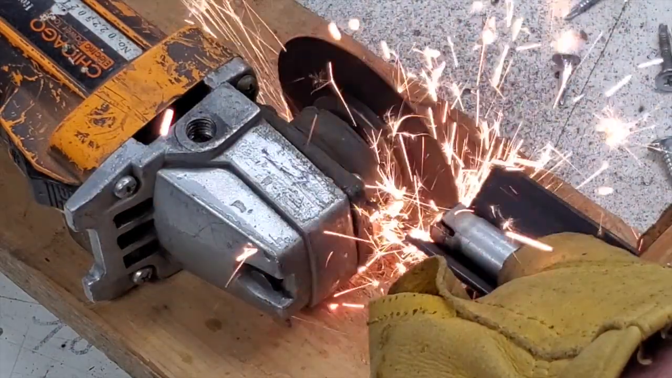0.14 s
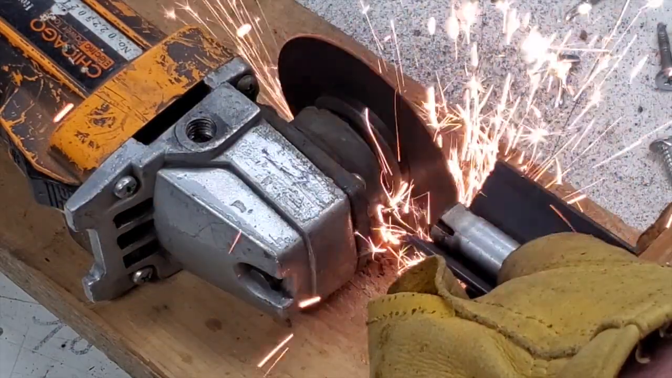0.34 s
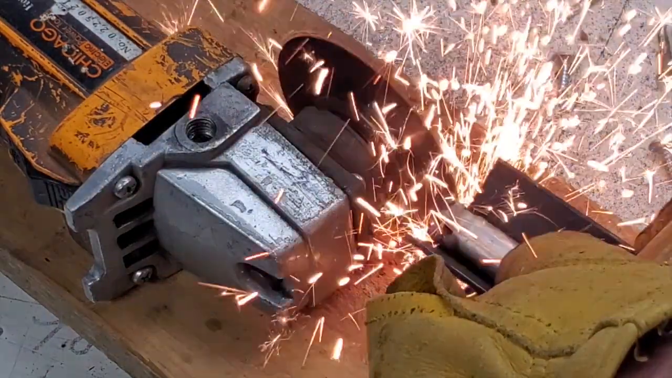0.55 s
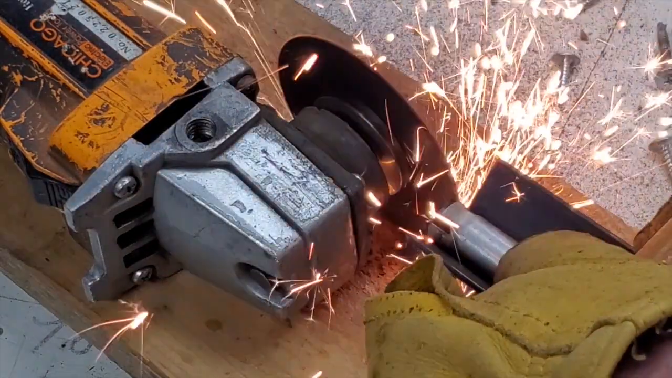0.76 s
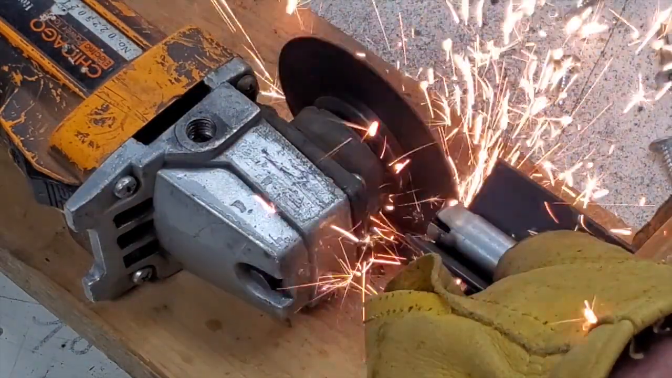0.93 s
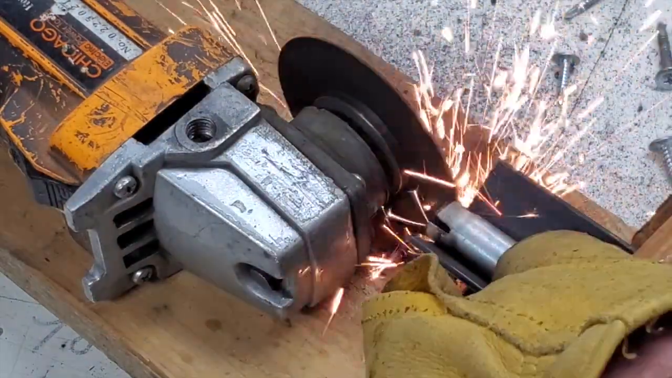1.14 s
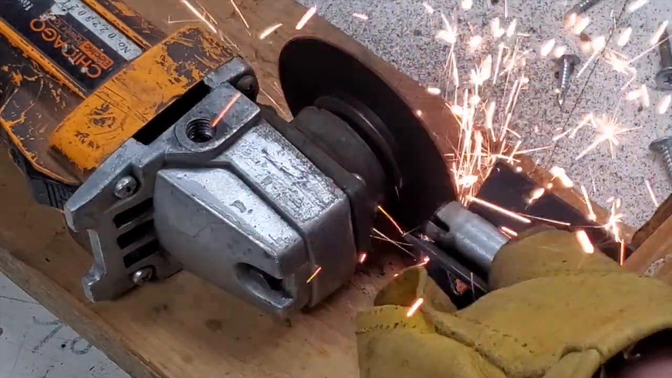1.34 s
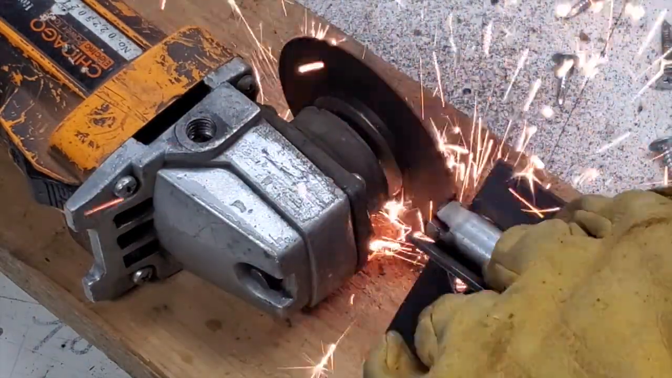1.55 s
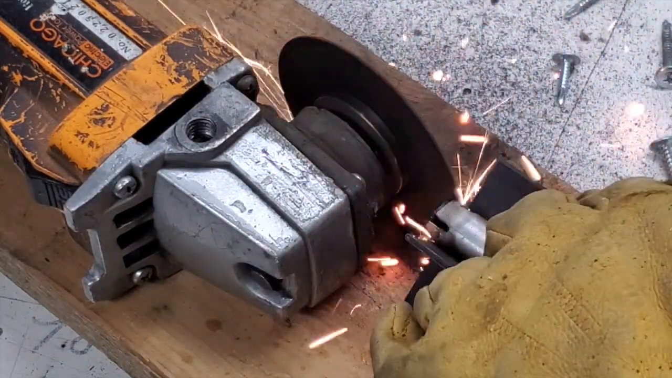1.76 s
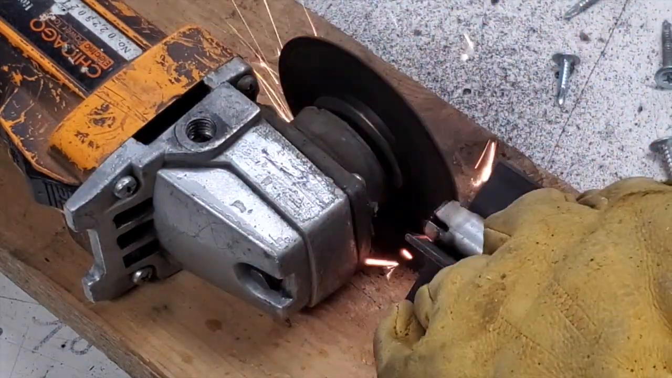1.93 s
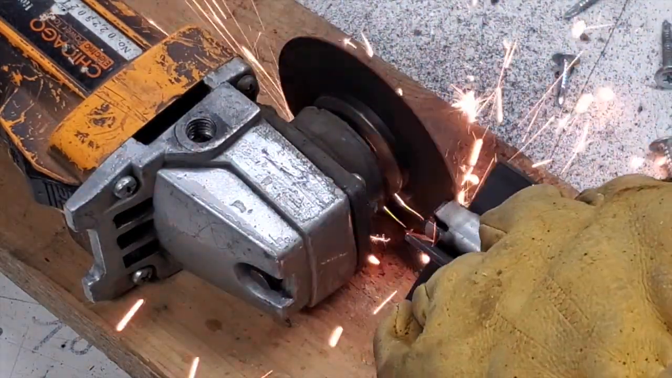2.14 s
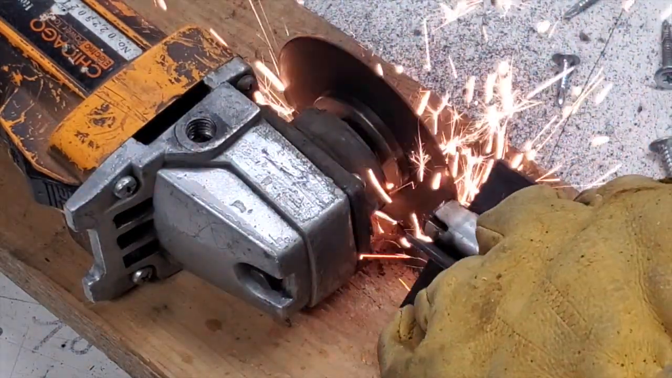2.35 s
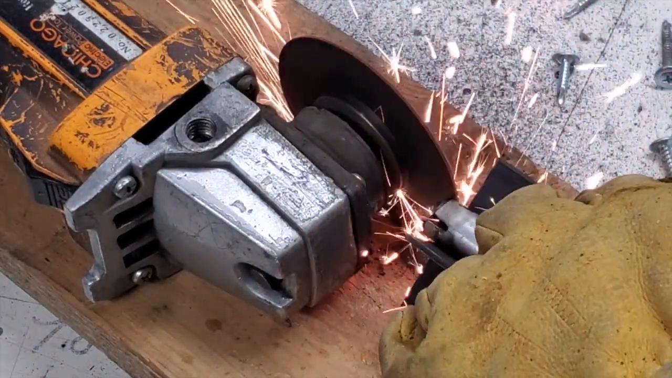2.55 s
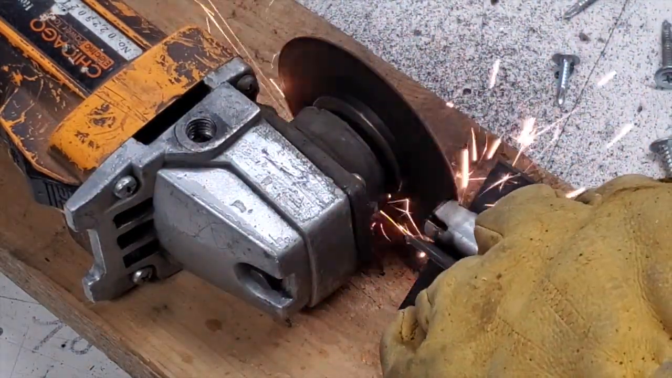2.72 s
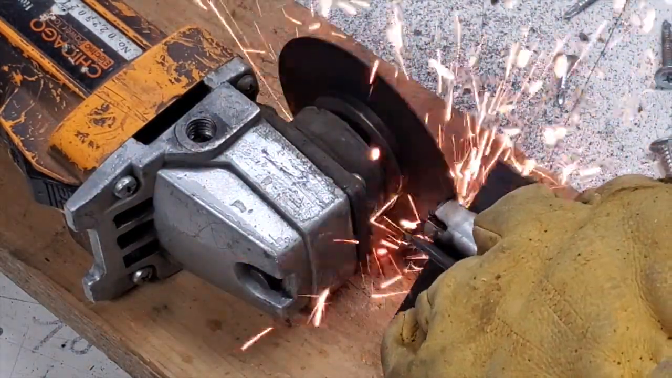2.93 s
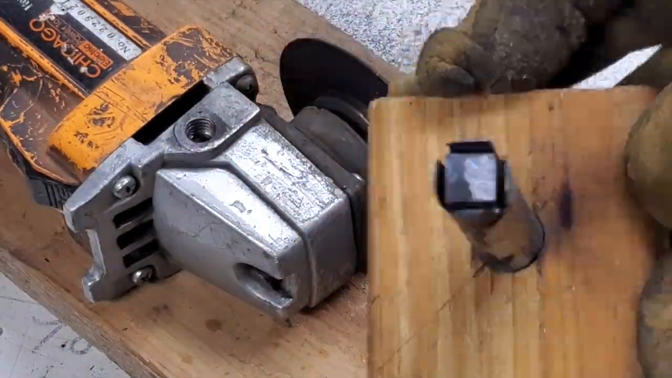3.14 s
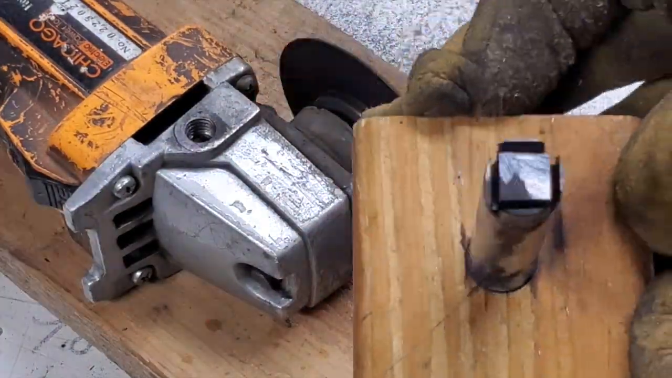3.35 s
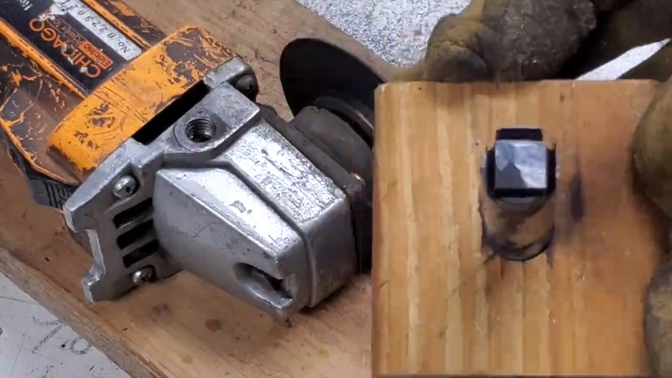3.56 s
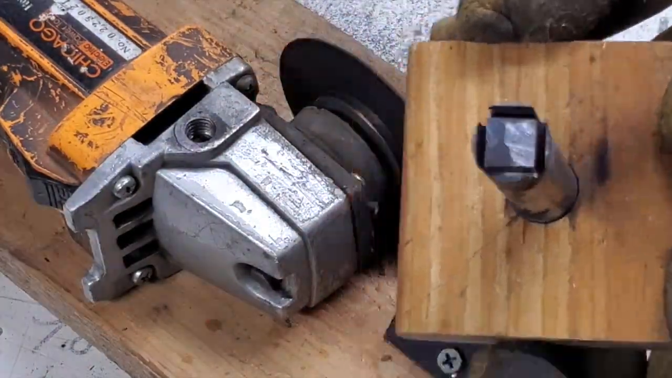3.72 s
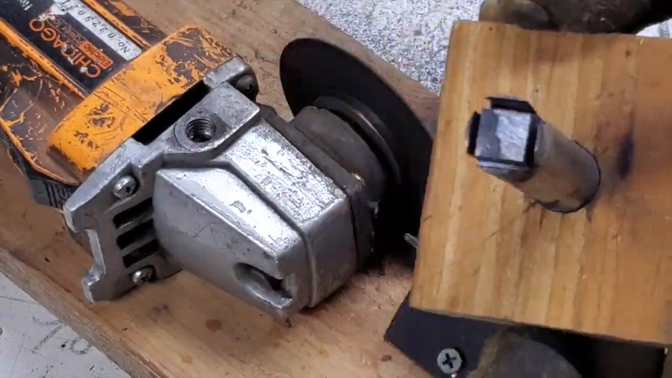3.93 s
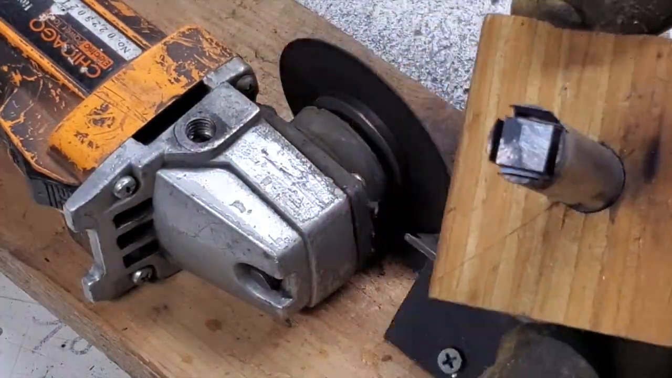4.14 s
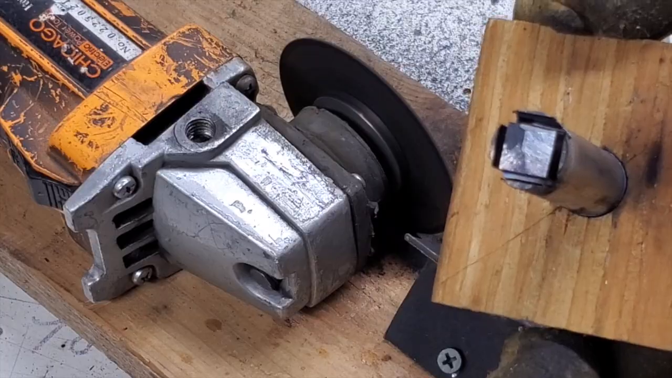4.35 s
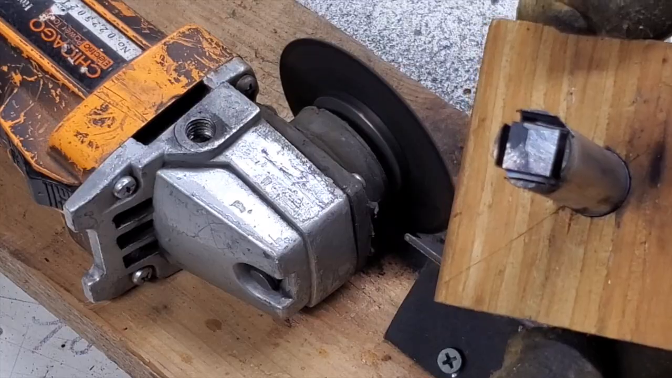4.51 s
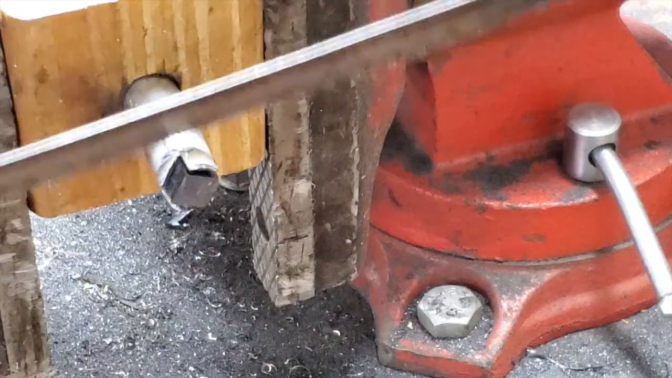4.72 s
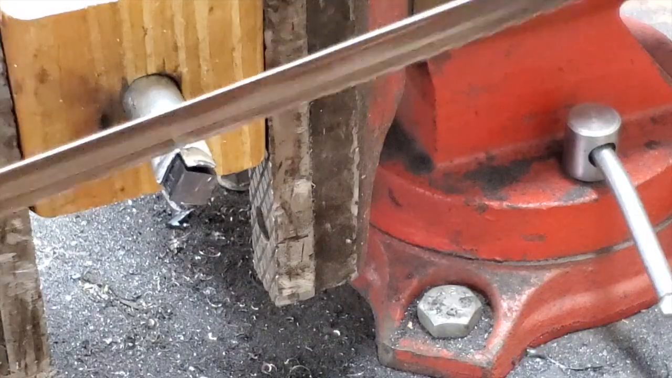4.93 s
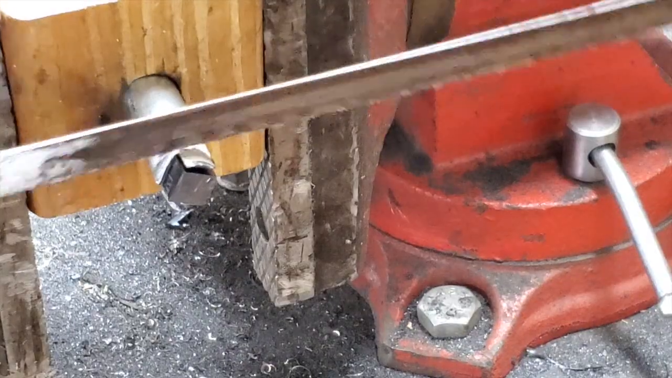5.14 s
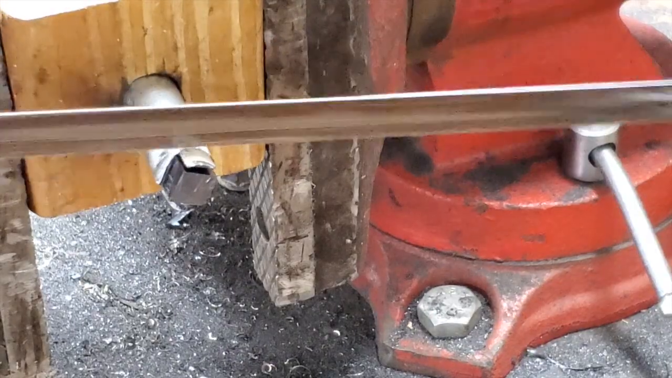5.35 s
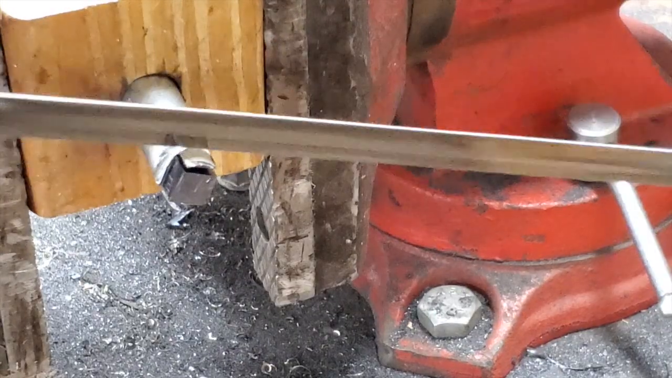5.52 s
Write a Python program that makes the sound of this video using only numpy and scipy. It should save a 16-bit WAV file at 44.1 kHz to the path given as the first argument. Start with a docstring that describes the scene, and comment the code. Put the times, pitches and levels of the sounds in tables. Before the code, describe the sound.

A grinder screeches and rasps on steel with sagging motor whine, cuts abruptly to a quiet fan hum, then rapid squeaky filing.

```python
"""A grinder's sagging whine, gritty rasp and screech give way abruptly to a fan's hum, then to quick filing.
Grinder: a bolt pressed to the disc loads the rotor, whose turns set the motor tones and the blows on steel.
Fan: wavering tones and a thin whistle stand over coloured noise of rushing air.
File: teeth scrape the bolt in a vice in short alternating strokes, exciting squeaks and ringing modes."""
import sys
import numpy as np
from scipy import signal
from scipy.fft import rfft, irfft, next_fast_len
from scipy.io import wavfile
from scipy.ndimage import uniform_filter1d

SR = 44100
rng = np.random.default_rng(int(sys.argv[2]) if len(sys.argv) > 2 else 0)


def pcm_store(signal):
    """Save signal as 16-bit PCM."""
    levels = np.round(np.clip(np.atleast_2d(signal), -1, 1) * 32767)
    wavfile.write(sys.argv[1], SR, levels.astype(np.int16).T)


N = 246075
TIME = np.arange(N) / SR
GRINDER_END_S, FILING_START_S = 3.053, 4.679

# stereo image of the grinder: frequency_hz, left_minus_right_db, likeness (1 same, -1 opposite; clipped)
GRINDER_IMAGE = [(50, -3.5, 1), (400, 1, 1), (1400, -3.5, 1), (2180, -4, 0.53), (3150, -0.5, 1),
                 (5500, -1.5, 0.63), (8200, 0.5, 0.67), (10100, 4, 0.56), (10540, 4, -0.046),
                 (12200, 15, 0.47), (13040, 10, 0.0094), (14100, 4, -0.6), (14600, -2, -0.37),
                 (15300, 9, -0.68)]
# stereo image of the file and bench: frequency_hz, left_minus_right_db, likeness (1 same, -1 opposite)
FILE_IMAGE = [(100, 0, 0.26), (300, 4.5, 0.079), (1620, -1.5, 0.74), (2360, -1, 0.15), (2950, -1, 0.9),
              (4530, -1, 0.17), (10000, 0.5, 0.46), (12900, 4, 0.3), (14000, 2, -.3), (15500, -1, 0.33)]
# the hand shifts its grip with a dull bump: middle_s, length_s, level_db
JOLTS = [(1.5, 0.18, -58)]


def grinder(rumble_db=-63, shake_db=-74):
    """Common drive: one rotor phase locks motor, rasp and screech; even chatter also shakes the bench."""
    # speed that the load allows the motor: time_s, speed_hz (rotor turns per second)
    allowed_speed = [(0.0, 581.0), (0.301, 591.1), (0.562, 542.0), (0.678, 472.4), (0.704, 498.8),
                     (0.854, 501.7), (0.949, 476.0), (1.039, 511.9), (1.207, 515.0), (1.262, 484.4),
                     (1.313, 500.4), (1.404, 489.6), (1.565, 515.6), (1.618, 499.6), (2.184, 473.0),
                     (2.26, 461.3), (2.362, 419.4), (2.542, 419.5), (2.705, 407.2), (2.931, 466.0),
                     (3.05, 426.8)]
    # pressure of the bolt on the disc: time_s, rasp_db, screech_db
    contact = [(0.0, -25, -23), (0.1, -26, -24.5), (0.58, -23.5, -20.5), (0.66, -24, -18), (0.68, -28, -22),
               (0.79, -25.5, -22), (1.42, -23.5, -19.5), (2.01, -27.5, -21), (2.28, -24.5, -19.5),
               (2.3, -25, -17), (2.51, -27.5, -16.5), (2.73, -27, -17.5), (2.89, -29, -22.5),
               (3.04, -25.5, -18)]
    # low rumble spectrum: frequency_hz, level_db (per Hz, relative)
    rumble_spectrum = [(25, -19), (70, -16), (130, -11.5), (200, -3.5), (290, 4.5), (400, -2.5)]
    inertia_s = .05  # the rotor's inertia rounds every change of load
    speed = uniform_filter1d(in_time(allowed_speed)[0], size=int(inertia_s * SR), mode="nearest")
    speed = speed * (1 + 0.001627 * drift(20))  # the motor never runs quite evenly
    turns = np.cumsum(speed) / SR
    rasp_db, screech_db = in_time(contact)
    chatter = chatter_share(speed)
    rumble_gain = from_db(rumble_db) + swells(JOLTS)
    rumble = rumble_gain * noise(rumble_spectrum, GRINDER_IMAGE, from_db(2.0 * drift(5.8)))
    shake = from_db(shake_db) * chatter * noise([(25, 0), (130, 0.0087)], FILE_IMAGE)
    tool = motor(speed, turns, rasp_db) + rasp(turns, rasp_db) + screech(turns, screech_db, chatter)
    return tool + rumble + shake


def motor(speed, turns, rasp_db, smear_per_multiple=0.08):
    """Rotating excitation: unbalance hums at rotor speed, a bearing whines above, load reweights the lines."""
    # rotor speeds at which the motor lines are given (Hz), falling with load
    load_speeds_hz = [575, 497, 460, 420]
    # motor lines: multiple (of rotor speed; broken ones are bearing sidebands),
    # then level_db at each load speed (before housing and strain)
    motor_lines = [(1.457, -55, -58.5, -58, -69.5), (2, -45.5, -45.5, -51.5, -52.5),
                   (3, -46, -41, -41, -47.5), (3.457, -41, -50.5, -79, -53.5), (4, -45, -43, -42.5, -50.5),
                   (5, -40, -49, -51, -50), (6, -42.5, -40.5, -43.5, -50), (6.371, -34.5, -41, -68, -51),
                   (7, -44.5, -39, -38, -42), (7.371, -47.5, -45.5, -45.5, -47), (8, -45, -49, -30, -39.5),
                   (9, -56, -44.5, -38.5, -41), (10, -47, -45, -44, -54), (12, -74, -48.5, -38, -73),
                   (15, -52, -42, -49, -48), (16, -58, -55, -35, -56)]
    # gear housing resonances favour the lines passing through: frequency_hz, gain_db
    housing = [(800, -3.5), (1200, 1), (1450, 2.5), (2000, 1), (2900, -1), (3350, 2.5), (3700, -0.5),
               (4200, 4.5), (5500, 1), (7700, 2)]
    # hum and whine swell at resonance: rotor_speed_hz, unbalance_hum_db, bearing_whine_db
    resonance = [(394, -43, -77), (433, -38.5, -61.5), (471.6, -37, -49.5), (485.5, -40.5, -46),
                 (508, -52.5, -56.5), (551, -44.5, -34), (585, -51.5, -33)]
    # commutator whistles: multiples of rotor speed
    commutator_orders = (29, 30, 31, 32)
    # level of those whistles where they pass: frequency_hz, level_db
    commutator = [(13000, -37), (13900, -36), (14300, -34), (14700, -38), (15400, -50), (16500, -56)]
    bearing_order = 2.457  # multiple of rotor speed
    jolt_damping_db = -17  # the hand damps the hum while the grip shifts
    strain_db, strain_follows = -1.47, .6  # at mean pressure; share of the rasp's swing

    hum_db, whine_db = at_hz(resonance, speed)
    hum_db = hum_db + jolt_damping_db * swells([(s, length, 0) for s, length, _ in JOLTS])
    pressure_db = rasp_db - rasp_db[TIME < GRINDER_END_S].mean()
    line_gain_db = strain_db + sag_db(speed) + strain_follows * pressure_db
    out = from_db(hum_db) * tone(turns, waver_db=1.37, smear=.04) * pan(-1.6)
    out += from_db(whine_db) * tone(bearing_order * turns, waver_db=1.1, smear=0.23) * pan(-5.0)
    for multiple, *levels_db in motor_lines:
        level_db = np.interp(speed, load_speeds_hz[::-1], levels_db[::-1])
        level_db = level_db + line_gain_db + at_hz(housing, multiple * speed)[0]
        balance_db = at_hz(GRINDER_IMAGE, multiple * load_speeds_hz[1])[0]
        line = tone(multiple * turns, waver_db=3.0, smear=smear_per_multiple * multiple)
        out += from_db(level_db) * line * pan(balance_db)
    for multiple in commutator_orders:
        level_db = at_hz(commutator, multiple * speed)[0]
        out += from_db(level_db) * tone(multiple * turns, waver_db=3.5, smear=0.97)
    return out


def sag_db(speed, limit_db=3):
    """Load response: the motor growls louder while speed lies under its running mean, softer above it."""
    window_s, db_per_hz = .3, 0.16
    usual = uniform_filter1d(speed, size=int(window_s * SR), mode="nearest")
    return np.clip(db_per_hz * (usual - speed), -limit_db, limit_db)


def rasp(turns, rasp_db, grit_db=0.5, bounce_db=1.17, flutter_db=1.0, shriek_db=-8):
    """Abrasive friction: uneven bites modulate noise, the disc resonates, and catches bark or shriek."""
    # lower and upper spectrum of the rasp: frequency_hz, level_db (per Hz, relative)
    body_spectrum = [(100, -36), (200, -29), (290, -48), (400, -20), (800, -17.5), (1100, -11), (1450, -1),
                     (1750, -6.5), (2000, -1), (2650, -7), (3300, 3), (4300, 3), (4700, -3.5), (5150, 2.5),
                     (6200, -7)]
    hiss_spectrum = [(5400, -12), (5800, -7), (6200, -10.5), (6650, 2.5), (7200, -3.5), (8200, 1.5),
                     (8800, -5.5), (9900, 1), (10800, -1), (14000, -0.5), (15800, 3.5)]
    # the bolt catches on the disc: middle_s, length_s, level_db (before the trims of bark and shriek)
    catches = [(0.444, 0.13, -31.5), (0.587, 0.02, -26), (0.645, 0.033, -27), (0.926, 0.11, -33),
               (1, .025, -30), (2.194, 0.041, -30), (2.752, .0058, -27), (3.013, 0.0035, -21)]
    # spectrum of the bark: frequency_hz, level_db (per Hz, relative)
    bark_spectrum = [(2800, -23), (3500, -31), (4100, 9), (5200, -5), (6500, -14), (9000, 1)]
    # multiples of rotor speed that shriek in a catch
    bark_orders = (7, 8, 9)
    # disc and guard ring under the grit: frequency_hz, width_hz, level_db (relative to the rasp)
    disc_modes = [(3410, 60, -16.5), (4910, 160, -15.5), (8135, 120, -12)]
    shriek_build_s = .02  # a catch must last longer than this to shriek

    bites = from_db(grit_db * drift(700) + bounce_db * drift(65)) * once_a_turn(turns, sharpness=0.13)
    # the bolt flutters in the hand
    body = noise(body_spectrum, GRINDER_IMAGE, bites * from_db(flutter_db * drift(160)))
    hiss = noise(hiss_spectrum, GRINDER_IMAGE, bites)
    grit = bites * rng.standard_normal(N)
    disc = sum(from_db(db) * rms_one(resonate(grit, hz, width_hz)) for hz, width_hz, db in disc_modes)
    shriek = sum(tone(multiple * turns, waver_db=4.5, smear=0.84) for multiple in bark_orders)
    held = swells([(s, length, db) for s, length, db in catches if length > shriek_build_s])
    bark_noise = noise(bark_spectrum, GRINDER_IMAGE, bites * once_a_turn(turns, sharpness=.8))
    bark = held * from_db(shriek_db) * shriek + from_db(-2.5) * swells(catches) * bark_noise
    return from_db(rasp_db) * (from_db(-4.0) * body + from_db(-2.5) * hiss + disc) + bark


def screech(turns, screech_db, chatter, trim_db=0.3, uneven_db=2.0, flicker_db=1.5):
    """Impact excitation: once-a-turn contact spits hiss when loose and rings modes in step when held hard."""
    # spectrum of the loose screech: frequency_hz, level_db (per Hz, relative)
    hiss_spectrum = [(10000, -17.5), (11000, -17), (11700, -10), (12150, -10), (12600, -2.5), (13050, -1.5),
                     (13550, -8.5), (14200, -5), (14800, -23.5), (15800, -40)]
    # ringing of the steel: frequency_hz, width_hz (of each of two passes), level_db (relative)
    steel_modes = [(11650, 230, 3), (12480, 710, 7), (13020, 310, 2), (14400, 840, -26)]
    bursts = once_a_turn(turns, sharpness=0.22) * from_db(flicker_db * drift(350))
    loose = noise(hiss_spectrum, GRINDER_IMAGE, bursts)
    # one blow a turn sets the steel ringing; its timing steadies as the chatter grows
    blows = np.interp(np.arange(1, int(turns[-1])) - .25, turns, TIME)
    chance = rng.standard_normal((len(blows), 2))
    jitter_s = np.interp(np.interp(blows, TIME, chatter), [.2, .8], [15e-6, 7e-6])
    places = (blows + jitter_s * chance[:, 0]) * SR
    clicks = np.zeros(N)
    # a short sinc places each blow between samples
    for tap in range(-4, 5):
        at = np.clip(places.astype(int) + tap, 0, N - 1)
        clicks[at] += from_db(uneven_db * chance[:, 1]) * np.sinc(at - places)
    ringing = 0
    for hz, width_hz, db in steel_modes:
        mode = resonate(resonate(clicks, hz, width_hz), hz, width_hz)
        ringing = ringing + from_db(db) * mode * pan(at_hz(GRINDER_IMAGE, hz)[0])
    mixed = np.sqrt(1 - chatter) * loose + np.sqrt(chatter) * rms_one(ringing)
    return from_db(screech_db + trim_db) * mixed


def chatter_share(speed):
    """Speed-dependent chatter: a rotor dragged below a threshold strikes the steel more evenly (0-1)."""
    hard_hz, hard_share, loose_share = 427, 0.71, .12
    loose = np.clip(speed - hard_hz, 0, 1)  # the change takes 1 Hz
    return hard_share + (loose_share - hard_share) * loose


def once_a_turn(turns, sharpness):
    """Periodic modulation: contact pressure peaks once in every rotor turn."""
    return np.exp(sharpness * np.cos(2 * np.pi * turns))


def filing(teeth_db=3.5, judder_db=1.5, tail_db=-15, tail_s=0.0038, push_db=-7, pull_db=-8, ring_db=-15):
    """Scraping friction: toothed noise fills each stroke; pushes bite darker, pulls skate and hiss."""
    # the file is set down, slides and bites in: middle_s, length_s, level_db
    touches = [(4.804, 0.013, -49), (4.85, 0.15, -57), (4.963, 0.022, -47.5), (5.018, 0.058, -30)]
    # spectrum of the scrape: frequency_hz, level_db (per Hz, relative)
    teeth_spectrum = [(400, -9), (900, -15), (1200, -1), (1500, -10), (1850, 3), (2500, 2), (3200, -14),
                      (4150, -2), (5500, 2.5), (6300, -1), (8500, 0), (11500, 2.5), (12800, 7), (13400, 4),
                      (15800, 4.5)]
    # the bench shakes under the vice: time_s, change_db
    bench_shake = [(4.7, 0), (4.92, -5), (5.0, 2.5), (5.3, 2), (5.58, -1.5)]
    # spectrum of that shaking: frequency_hz, level_db (per Hz, relative)
    boom_spectrum = [(25, -14.5), (70, -19), (140, -9), (220, -1), (320, -3), (480, -7.5), (700, -16),
                     (1500, -23), (5000, -35), (15000, -41)]
    bite_spectrum = [(1700, -1.5), (2500, -4.0), (3200, 0.5), (4800, 5.5), (5800, -2)]
    skate_spectrum = [(6000, 1), (10000, 16), (12800, -11), (15800, -13)]
    bench_db = -50.5
    push_squeak_hz, push_squeak_db = 2410, -9  # level relative to the stroke
    pull_squeak_hz, pull_squeak_db = 3020, -13.5

    pulls, pushes = to_and_fro()
    strokes = swells(touches) + swells(pulls) + swells(pushes)
    fade = np.exp(-1 / (tail_s * SR))
    tail = from_db(tail_db) * signal.lfilter([1 - fade], [1, -fade], strokes)
    teeth = from_db(teeth_db * drift(600) + judder_db * drift(80))
    scrape = strokes * noise(teeth_spectrum, FILE_IMAGE, teeth) + tail * noise(teeth_spectrum, FILE_IMAGE)
    bite = (swells(touches) + swells(pushes)) * noise(bite_spectrum, FILE_IMAGE, teeth)
    # the file skates only once it is up to speed, from the second pull on
    skate = swells(pulls[1:]) * noise(skate_spectrum, FILE_IMAGE, teeth)
    boom = noise(boom_spectrum, FILE_IMAGE, from_db(4.15 * drift(38.6)))
    bench = from_db(bench_db + in_time(bench_shake)[0]) * boom
    ringing = from_db(ring_db) * vice_ring(strokes)
    singing = from_db(push_squeak_db) * squeaks(pushes, push_squeak_hz)
    singing = singing + from_db(pull_squeak_db) * squeaks([*touches, *pulls], pull_squeak_hz)
    friction = from_db(-6.0) * scrape + from_db(push_db) * bite + from_db(pull_db) * skate
    return friction + ringing + singing + bench


def to_and_fro():
    """Reciprocating motion: pulls and pushes alternate evenly, levelled by the arm's effort."""
    # effort of the filing arm: time_s, level_db
    effort = [(5.07, -28.5), (5.11, -36.5), (5.15, -30.5), (5.33, -28), (5.55, -30.5), (5.6, -26.5)]
    first_stroke_s, stroke_s = 5.0705, .0401  # middle of the first stroke; time per stroke
    pull_s, push_s = 0.034, 0.041  # length in contact
    times = np.arange(first_stroke_s, TIME[-1] + stroke_s / 2, stroke_s)
    strokes = list(zip(times, np.interp(times, *np.transpose(effort))))
    pulls = [(s, pull_s, db) for s, db in strokes[::2]]
    pushes = [(s, push_s, db) for s, db in strokes[1::2]]
    return pulls, pushes


def squeaks(strokes, centre_hz, pass_width_hz=440, scatter_octaves=0.17):
    """Friction-fed resonance: each stroke makes file and bolt sing at a pitch scattered by chance."""
    out = 0
    for stroke in strokes:
        hz = centre_hz * 2 ** (scatter_octaves * rng.standard_normal())
        once = resonate(rng.standard_normal(N), hz, pass_width_hz)
        sing = rms_one(resonate(once, hz, pass_width_hz))
        out = out + swells([stroke]) * sing
    return out


def vice_ring(strokes, uneven_db=5.5):
    """Modal ringing: scraping feeds each mode with shifting strength, and modes decay past each stroke."""
    # ringing of file, bolt and vice: frequency_hz, width_hz, level_db (relative)
    vice_modes = [(1910, 32, -10), (2270, 24, -8), (2530, 36, -10), (2776, 48, -2.5), (3875, 18, -2),
                  (4150, 53, -3), (5010, 100, -5.5), (6290, 200, 2.5), (8060, 150, -2.5), (9450, 180, -6.5),
                  (10550, 130, -7), (12400, 230, -4), (12600, 220, 3), (14200, 160, 3)]
    out = 0
    for hz, width_hz, db in vice_modes:
        drive = strokes * from_db(db + uneven_db * drift(14)) * rng.standard_normal((2, N))
        # a narrow mode keeps only its share of the drive's power, so it is scaled back up
        power_makeup = np.sqrt(SR / (np.pi * width_hz))
        out = out + resonate(drive, hz, width_hz) * power_makeup * pan(at_hz(FILE_IMAGE, hz)[0])
    return out


def fan():
    """Tones over broadband flow noise: wavering hums and a thin whistle stand above rushing air."""
    # fan tones: frequency_hz, level_db, left_minus_right_db
    fan_tones = [(236, -83, 0), (343, -73.5, -1), (688, -59.5, -9), (842, -60, 3.5), (1035, -62.5, 6),
                 (1376, -68.5, -8), (1550, -81, -9), (1724, -64.5, -18), (1840, -67.5, 2), (2200, -60, 0),
                 (2454, -66, 0), (2430, -72, 6), (2800, -66.5, -22), (5800, -62.5, 8), (6200, -63, 2),
                 (10148.5, -54.5, -17)]
    # spectrum of the air: frequency_hz, level_db (per Hz, relative)
    air_spectrum = [(30, -39), (120, -25), (300, -15), (420, -11.5), (750, -5), (1200, -1.5), (2200, 3),
                    (3300, 0.5), (5000, 3), (5800, 6.5), (6350, 16.5), (7300, 3), (10000, 4.5), (12800, -6),
                    (15800, -11)]
    # stereo image of the air: frequency_hz, left_minus_right_db, likeness (1 same, -1 opposite; clipped)
    air_image = [(100, 2, .95), (700, -5, 0.59), (2400, 0.5, 1), (4300, -0.5, 0.48), (5700, 8, .45),
                 (5970, 22, -0.59), (7460, -3, 0.0058), (10500, -3, -0.86), (12600, -40, -1.3),
                 (15000, 2, 0.28)]
    air_db = -45.92
    tones = 0
    for hz, db, balance_db in fan_tones:
        tones = tones + from_db(db) * tone(hz * TIME, waver_db=1.53, smear=0.17) * pan(balance_db)
    return tones + from_db(air_db) * noise(air_spectrum, air_image)


def noise(spectrum, image, grain=1):
    """Spectral shaping: stereo noise is chopped by grain, then coloured, with steep skirts; rms 1."""
    size = next_fast_len(N)
    hz = np.maximum(np.arange(size // 2 + 1) * SR / size, 1)
    mid, side = rfft(rng.standard_normal((2, N)) * grain, size)
    balance_db, alike = at_hz(image, hz)
    alike = np.clip(alike, -1, 1)
    low_skirt = np.minimum(hz / spectrum[0][0], 1) ** 4
    high_skirt = np.minimum(spectrum[-1][0] / hz, 1) ** 8
    colour = from_db(at_hz(spectrum, hz)[0]) * low_skirt * high_skirt
    # the shared part is the likeness of the channels; the other part enters with opposite signs
    pair = np.sqrt(1 + alike) * mid + np.sqrt(1 - alike) * side * [[1], [-1]]
    return rms_one(irfft(pair * pan(balance_db) * colour, size)[:, :N])


def tone(cycles, waver_db, smear):
    """Amplitude and phase modulation: a sine of rms about 1 wavers in level and phase (smear in radians)."""
    phase = 2 * np.pi * cycles
    return np.sqrt(2) * from_db(waver_db * drift(18.3)) * np.sin(phase + smear * drift(25))


def resonate(x, hz, width_hz):
    """Damped resonance: a two-pole filter with gain 1 at its peak."""
    r = np.exp(-np.pi * width_hz / SR)
    numerator = np.array([1, 0, -1]) * (1 - r * r) / 2
    denominator = [1, -2 * r * np.cos(2 * np.pi * hz / SR), r * r]
    return signal.lfilter(numerator, denominator, x + 1e-18)


def swells(rows, reach=0.35, rise_power=3.0, fall_power=2.22):
    """Asymmetric envelope: each row (middle_s, length_s, level_db) sets in firmly and dies more softly."""
    out = 0
    for s, length, db, *_ in rows:
        span = abs(TIME - s) < 1.5 * length
        away = (TIME[span] - s) / (reach * length)
        swell = np.zeros(N)
        swell[span] = np.exp(-abs(away) ** np.where(away < 0, rise_power, fall_power))
        out = out + from_db(db) * swell
    return out


def drift(rate_hz):
    """Band-limited chance: smoothed random steps vary up to about rate_hz, with spread 1."""
    count = 12  # random steps per period of rate_hz
    steps = int(TIME[-1] * rate_hz * count) + 2
    chance = rng.standard_normal(N)[:steps]
    slow = uniform_filter1d(uniform_filter1d(chance, size=4), size=4)
    return np.interp(TIME * rate_hz * count, np.arange(steps), rms_one(slow))


def pan(balance_db):
    """Level-difference stereo: left and right gains whose mean is 1."""
    gains = from_db(np.atleast_1d(balance_db) * np.array([[.5], [-.5]]))
    return gains / gains.mean(0)


def in_time(rows):
    """Linear interpolation: each column of a time table at every sample."""
    s, *columns = np.transpose(rows)
    return [np.interp(TIME, s, c) for c in columns]


def at_hz(rows, hz):
    """Logarithmic frequency scale: each column of a frequency table, read on a log axis."""
    points, *columns = np.transpose(rows)
    return [np.interp(np.log(hz), np.log(points), c) for c in columns]


def from_db(db):
    """Decibel law: level to amplitude gain."""
    return 10 ** (np.asarray(db) / 20)


def rms_one(x):
    """Power normalisation: scale to rms 1; a stereo pair is judged by its middle."""
    return x / np.sqrt(np.mean(np.atleast_2d(x).mean(0) ** 2) + 1e-20)


def after(s, fade_s=0.012):
    """Short crossfade: a quick switch from 0 to 1 centred on s."""
    return np.clip((TIME - s) / fade_s + .5, 0, 1)


def scene():
    """Succession: grinding, the idle workshop and filing follow each other abruptly."""
    stopped, files = after(GRINDER_END_S), after(FILING_START_S)
    return grinder() * (1 - stopped) + fan() * (stopped - files) + filing() * files


def record(dry):
    """Soft saturation and low-pass filtering: the highest peaks are rounded and the top is cut steeply."""
    rounded = dry / (1 + (dry / .95) ** 8) ** (1 / 8)
    cutoff_hz = 15900
    low_pass = signal.ellip(12, .1, 80, cutoff_hz, fs=SR, output="sos")
    return signal.sosfilt(low_pass, rounded)


dry = scene()
out = record(dry)
pcm_store(out)
```